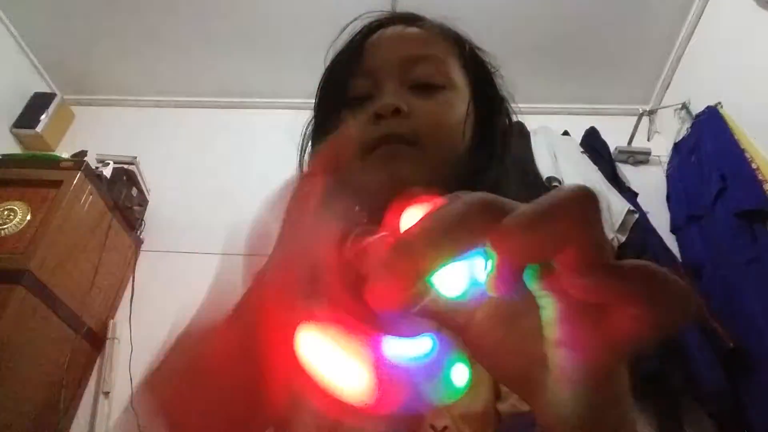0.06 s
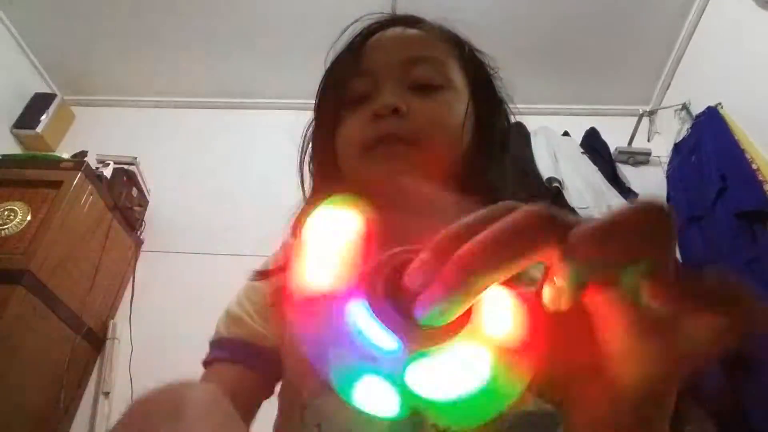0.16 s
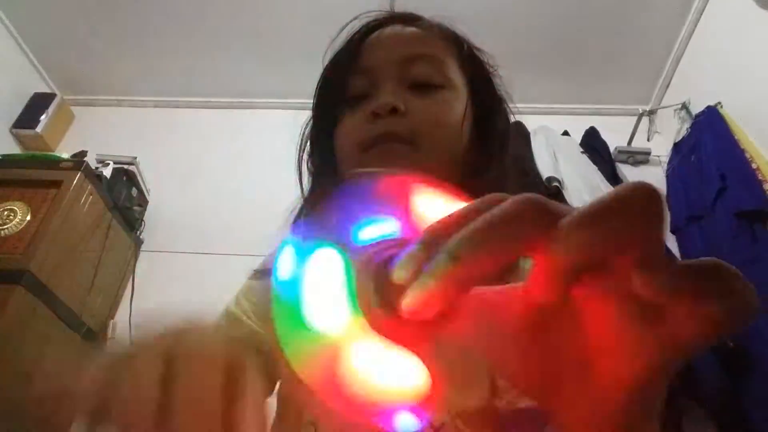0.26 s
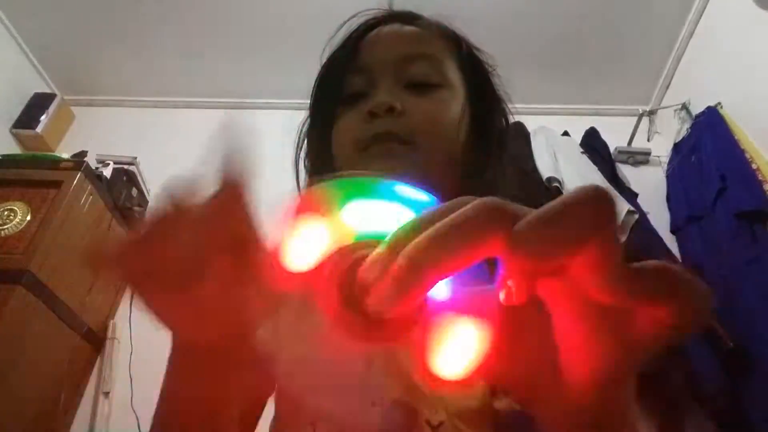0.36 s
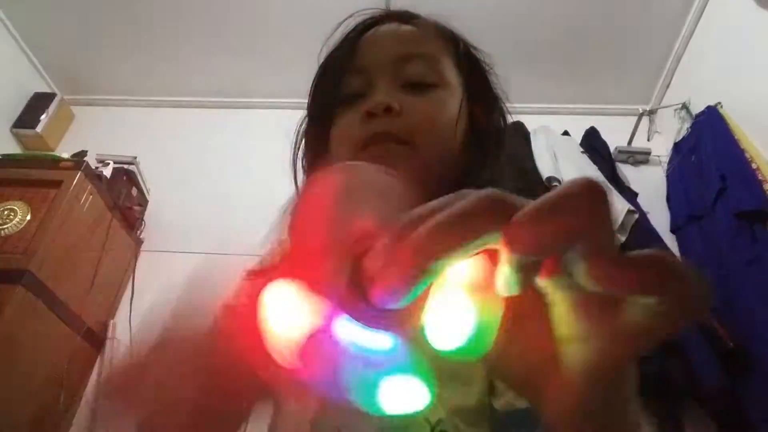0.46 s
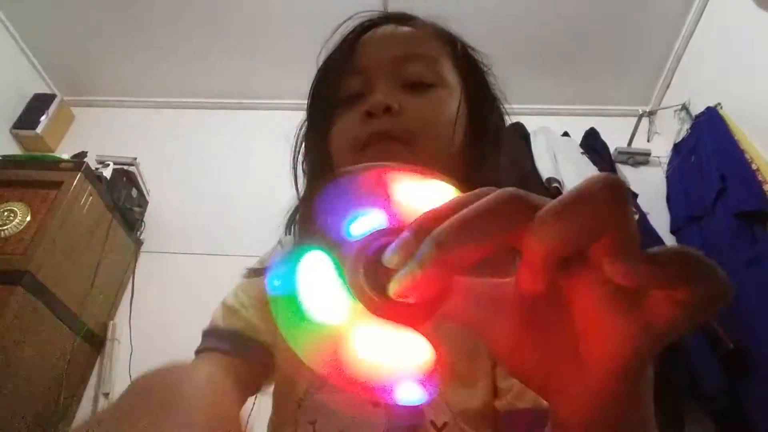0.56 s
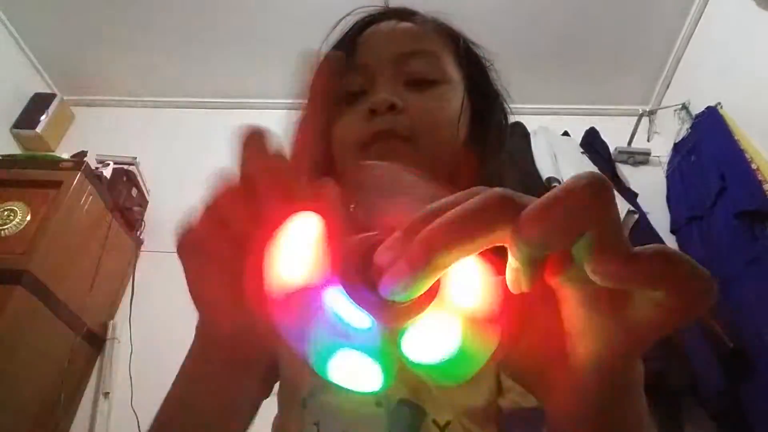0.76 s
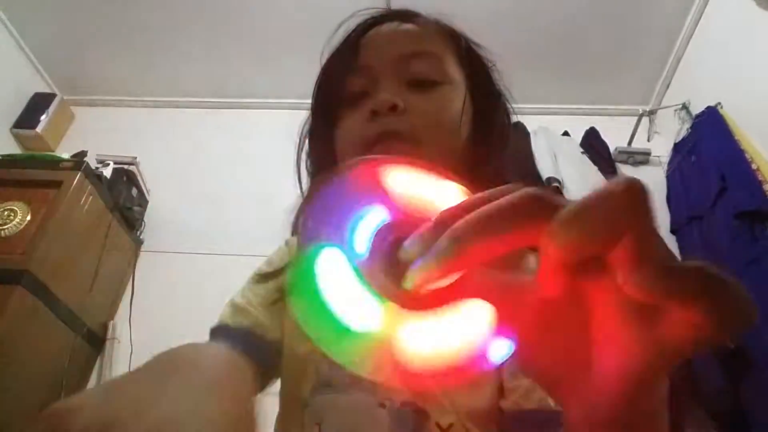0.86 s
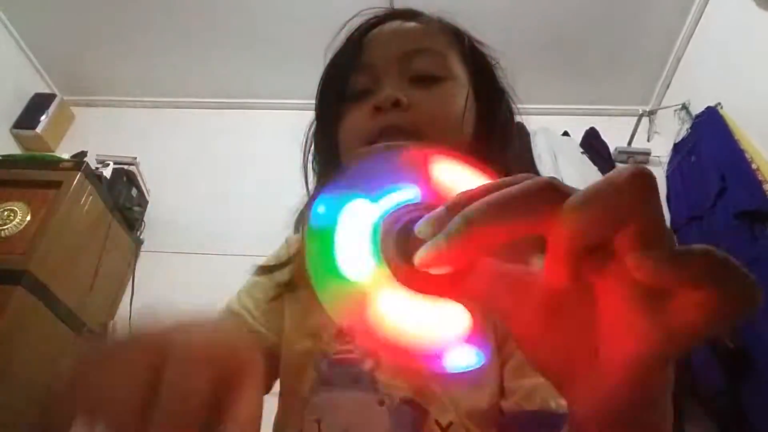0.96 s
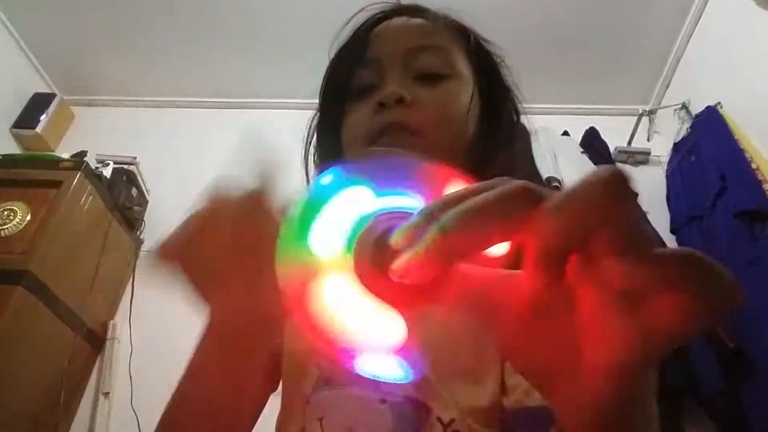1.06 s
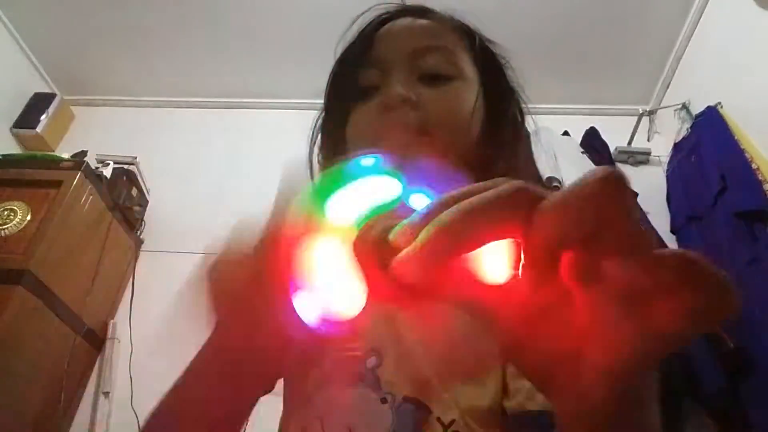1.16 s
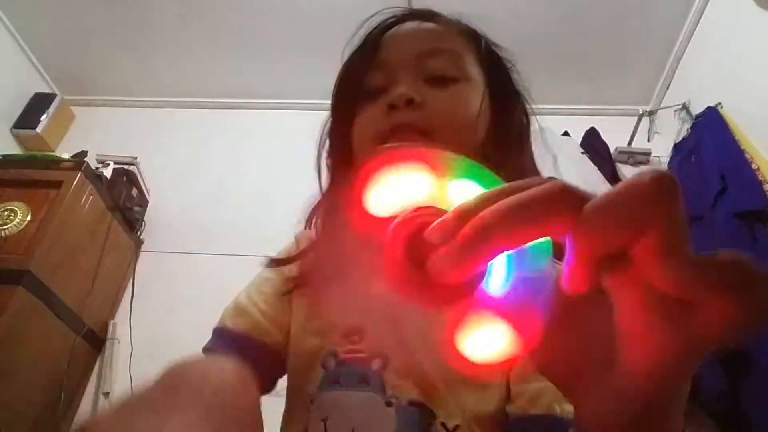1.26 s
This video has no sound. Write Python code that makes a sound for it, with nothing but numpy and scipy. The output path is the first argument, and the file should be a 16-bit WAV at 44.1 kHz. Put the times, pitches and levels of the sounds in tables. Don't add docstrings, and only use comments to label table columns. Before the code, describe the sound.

A plastic toy spinner rattles faintly and ticks close to the microphone in a quiet, softly humming room. A finger flicks it at about 0.2 seconds, with bright ringing clicks bouncing until 0.33, then again at 0.6. A small air puff bumps the microphone near 0.7. A third flick at 0.97 sets off quick chatter, thinning into tiny ticks by 1.3 seconds.

```python
import sys
import numpy as np
from scipy import signal
from scipy.fft import rfft, irfft
from scipy.io import wavfile
from scipy.ndimage import uniform_filter1d

SR = 44100
rng = np.random.default_rng(int(sys.argv[2]) if len(sys.argv) > 2 else 0)


def linear_from_db(decibels):
    return 10 ** (np.asarray(decibels, float) / 20)


def wav_record(signal):
    frames = np.transpose(np.atleast_2d(signal))
    bounded = np.clip(frames, -1, 1)
    quanta = np.round(bounded * 32767).astype(np.int16)
    wavfile.write(sys.argv[1], SR, quanta)


N = 57330


def ring(x, hz, width):
    return signal.lfilter(*signal.iirpeak(hz, hz / width, SR), x)


def steep(x, hz, width):
    return ring(ring(x, hz, 1.49 * width), hz, 1.49 * width)


def level(x, db):
    return x * linear_from_db(db) / np.sqrt(np.mean(x ** 2))


def walk(rate_hz):
    k = int(SR / rate_hz)
    smooth = uniform_filter1d(uniform_filter1d(rng.standard_normal(N), k), k)
    return level(smooth, 0)


def clicks(rows, rise_s):
    # f/Hz, width/Hz, level/dB
    body = [(1740, 770, -25), (2620, 520, -23), (3216, 600, -19), (4020, 1200, -23.5)]
    treble = [(6115, 600, -8), (6900, 390, -17), (7685, 260, -18.5), (8360, 150, -18.5), (9830, 390, -29.5),
              (11200, 360, -28.5), (12700, 800, -55), (15900, 700, -46)]
    modes = [*body, *treble]
    main_width_hz, detune, scatter_db = 350, 0.019, 1.5
    contact_s, tail_s, tail = 0.0023, 0.011, linear_from_db(-8)
    size, lead_s = 3072, 0.003
    t = np.arange(size) / SR - lead_s
    fade = np.exp(-(t / contact_s) ** 2) * (1 - tail) + tail * np.exp(-np.abs(t) / tail_s)
    push = np.where(t < 0, np.exp(-(t / rise_s) ** 2), fade)
    strike = linear_from_db(16) * (np.arange(size) == int((lead_s - rise_s / 2) * SR))
    out = np.zeros(N + 4096)
    for s, db, hz, body_db, treble_db in rows:
        scratch = linear_from_db(-8) * push * rng.standard_normal(size)
        x = strike + scratch
        chance = rng.standard_normal((len(modes), 2))
        y = level(ring(steep(x, hz, main_width_hz), hz, 3 * main_width_hz), 0)
        for (f, w, g), c in zip(modes, chance):
            f = f * (1 + detune * c[1])
            side_db = body_db if f < hz else treble_db
            y = y + level(steep(x, f, w), g + scatter_db * c[0] + side_db)
        i = int((s + rise_s) * SR)
        out[i:i + size] += y * linear_from_db(db) / np.abs(y).max()
    return out[int(lead_s * SR):][:N]


def room():
    # f/Hz, level/dB
    air_colour = [(30, -39), (48, -3), (303, -1.5), (380, -8), (620, -11.5), (2230, -27), (4080, -34),
                  (5310, -31), (16000, -47.5)]
    # f/Hz, level/dB
    hum_tones = [(251, -69.5), (300, -62.5), (500, -73.5)]
    hz, db = np.array(air_colour).T
    f = np.maximum(np.arange(N // 2 + 1) * SR / N, 1)
    colour = linear_from_db(np.interp(np.log(f), np.log(hz), db))
    air = irfft(rfft(rng.standard_normal(N)) * colour, N)
    hum = 0
    for f0, g in hum_tones:
        loudness = linear_from_db(g + 1.5 * walk(37))
        pitch_hz = f0 * (1 + 0.00822 * walk(16.3))
        hum = hum + loudness * np.sin(2 * np.pi * np.cumsum(pitch_hz) / SR)
    return level(air, -61) * linear_from_db(2 * walk(9.9)) + hum


def puff():
    # t/s, level/dB, f/Hz, direction and size (1 = full)
    air_bumps = [
        (.6990, -39.5, 86, 0.9),
        (.7205, -47, 83, -1.1),
        (.685, -50, 510, 1),
        (.6968, -43.5, 355, 0.91),
    ]
    rush_s, rush_len_s = 0.692, 0.009
    t = np.arange(N) / SR
    bumps = 0
    for s, db, hz, way in air_bumps:
        fade = np.exp(-((t - s) * hz * 2.3) ** 2)
        bumps = bumps + linear_from_db(db) * np.sin(2 * np.pi * hz * (t - s)) * fade * way
    rush = level(steep(rng.standard_normal(N), 3200, 3400), -53.5)
    return bumps + rush * np.exp(-((t - rush_s) / rush_len_s) ** 2)


def bearing():
    # t/s, level/dB
    rattle = [(.04, -63), (.11, -61), (.2, -65), (.25, -58), (.3, -49.5), (.35, -60.5), (.45, -63),
              (.56, -64), (.62, -63.5), (.68, -57.5), (.8, -64.5), (.9, -66.5), (.96, -63.5), (1.02, -54.5),
              (1.1, -61.5), (1.15, -64.5), (1.195, -59.5), (1.3, -60)]
    # f/Hz, width/Hz, level/dB
    race = [(2520, 450, -12.5), (3320, 400, -13), (4300, 880, -14), (4900, 600, -10.5), (5350, 253, 0),
            (6220, 430, -10), (7060, 560, -32), (8020, 830, -14), (9440, 480, -31), (10970, 550, -23.5),
            (12900, 1300, -32), (14700, 500, -26)]
    # rate/(1/s), level/dB, f/Hz, width/Hz
    cage = (255, -3.5, 5378, 330)
    balls_per_s, ball_spread_db, ball_cap, hiss_share = 3000, 1.5, 3.2, 0.48
    hit, size = rng.random(N), rng.exponential(size=N)
    sign, hiss = rng.standard_normal(N), rng.standard_normal(N)
    ball_size = linear_from_db(ball_spread_db * np.minimum(size, ball_cap))
    balls = (hit < balls_per_s / SR) * ball_size * np.sign(sign)
    push = level(balls, 0) + hiss_share * hiss
    y = 0
    for k, (f, w, g) in enumerate(race):
        y = y + (-1) ** k * linear_from_db(g) * steep(push, f, w)
    cage_rate, cage_db, cage_hz, cage_width_hz = cage
    taps = (hit > 1 - cage_rate / SR) * sign
    y = level(y, 0) + level(steep(taps, cage_hz, cage_width_hz), cage_db)
    flutter = linear_from_db(2.5 * walk(143))
    s, db = np.array(rattle).T
    return level(y * flutter, 0) * linear_from_db(np.interp(np.arange(N) / SR, s, db))


def loose_parts():
    # t/s, peak level/dB, main ring f/Hz, body level/dB, treble level/dB
    loose_ticks = [(0.0338, -47.5, 5500, 3, 6), (0.0717, -54, 5000, 2, -6), (0.0952, -41.5, 5350, -17, -3),
                   (0.3656, -50, 5560, 11, 8), (0.4079, -41, 5290, -12, -2), (0.4414, -46, 5360, 3, -3),
                   (0.4988, -56, 5530, 0, 3), (0.5121, -37.5, 5000, -9, -3), (0.5244, -45.5, 5470, -6, -4),
                   (0.5706, -55, 5250, 0, 3), (0.596, -51, 5390, 13, -4), (0.6534, -40, 5000, 0, 2),
                   (0.6684, -44, 5000, -4, 1), (0.7339, -40.5, 5400, 5, 6), (0.819, -48.5, 5300, -5, 7),
                   (0.9138, -52, 5410, -13, -16), (0.9368, -53, 5200, -5, 0)]
    chatter = [(0.9861, -35, 5340, 3, 2), (0.996, -38, 5240, -6, -2), (1.0012, -42, 5330, 8, 5),
               (1.0104, -46, 5500, 15, 9), (1.02, -44, 4560, 2, 13), (1.0262, -50, 5670, 0, 3),
               (1.0319, -42, 5550, 6, 6), (1.0354, -44, 5560, 5, 2), (1.0406, -46, 5180, 0, 2),
               (1.055, -46, 5400, 8, 6), (1.0729, -40, 5450, -7, -5), (1.0755, -42, 5230, -1, -3),
               (1.086, -41, 5040, 2, 0), (1.0977, -42, 5270, 7, 1), (1.173, -48, 5350, 2, -2),
               (1.1953, -49, 5090, -10, -2), (1.285, -45.5, 4930, -9, -3)]
    further_ticks = [(.2290, -44, 5200, -8, -9), (.3010, -43, 5140, 7, 7), (.3470, -49, 4970, 0, 7),
                     (.4230, -56, 5350, -3, 8), (.4560, -47, 5460, -1, -7), (.4660, -51, 5200, 0, -10),
                     (.4840, -68, 5250, 0, -5), (1.168, -52, 5300, -2, -2), (1.1785, -52, 4800, -4, -8),
                     (1.1835, -52, 5350, -10, -6), (1.189, -50, 5200, -6, -6), (1.1925, -46, 5100, -8, -10),
                     (1.2030, -52, 5200, -8, -8), (1.2060, -52, 5030, -8, -4), (1.2170, -59, 5300, 7, 5),
                     (1.2505, -55.5, 5450, 7, 0), (1.2570, -58, 5350, 0, 0), (1.2670, -51, 4900, 2, 1),
                     (1.2760, -54, 5630, -6, -6), (1.2910, -51, 5400, -6, -6), (1.2980, -52, 5300, -4, -4)]
    rise_s = 0.001099
    return clicks(loose_ticks, rise_s) + clicks(chatter, rise_s) + clicks(further_ticks, rise_s)


def glints():
    # t/s, peak level/dB
    edge_contacts = [
        (.2165, -66),
        (.2625, -62),
        (0.314, -58),
        (0.614, -55),
        (0.632, -55),
        (0.985, -44),
        (1.002, -64),
    ]
    # f/Hz, width/Hz, level/dB
    glint_modes = [(15400, 1250, -1), (11100, 480, -4)]
    glint_s = 0.0011
    t = np.arange(N) / SR
    gate = 0
    for s, db in edge_contacts:
        gate = gate + linear_from_db(db) * np.exp(-((t - s - glint_s / 2) / glint_s) ** 2)
    x = rng.standard_normal(N)
    scratch = sum(linear_from_db(g) * steep(x, f, w) for f, w, g in glint_modes)
    return gate * level(scratch, 0)


def knocks():
    # t/s, low knock level/dB, mid knock level/dB
    landings = [
        (0.217, -38, -39.5),
        (0.262, -40, -38),
        (.2760, -44.5, -53),
        (0.408, -69, -58),
        (0.6086, -42.5, -42.5),
        (.6180, -43.5, -53),
        (0.6278, -38.5, -55),
        (0.97, -46, -56),
        (0.984, -44.5, -54),
    ]
    # f/Hz, width/Hz, level/dB
    low_modes = [(345, 310, 4.5), (610, 460, 5), (1110, 640, 1.5), (1840, 480, 4)]
    mid_modes = [(2500, 620, 0), (3400, 680, 0.5)]
    tap = np.eye(1, 999)[0]
    out = 0
    for col, modes in enumerate([low_modes, mid_modes]):
        push = np.zeros(N)
        for row in landings:
            push[int(row[0] * SR)] = linear_from_db(row[1 + col])
        knock = sum(linear_from_db(g) * steep(tap, f, w) for f, w, g in modes)
        out = out + np.convolve(push, knock / np.abs(knock).max())[:N]
    return out


def pings():
    # t/s, peak level/dB, f/Hz, width/Hz
    single_rings = [(.2160, -39.5, 3430, 400), (.2165, -48.5, 880, 300), (.2165, -45.5, 590, 250),
                    (0.217, -49, 7400, 400), (.2610, -39, 3150, 380), (.2620, -20, 5024, 247),
                    (.2630, -27.5, 5530, 250), (.9690, -27, 5260, 296), (.2615, -28.5, 6270, 320),
                    (0.262, -28.5, 6770, 350), (.2610, -51, 1700, 300), (.2680, -52.5, 1030, 250),
                    (.2760, -37, 6090, 260), (.2760, -41, 4600, 400), (0.3174, -45, 3590, 400),
                    (.4085, -50.5, 2600, 258), (.4085, -50.5, 6400, 260), (.4230, -58, 2840, 400),
                    (0.512, -56, 3250, 300), (.5030, -54.5, 6280, 200), (.6090, -35.5, 3370, 390),
                    (0.6091, -38, 6070, 260), (.6090, -45.5, 1740, 310), (.6090, -50.5, 860, 400),
                    (.6145, -43.5, 3400, 400), (.6280, -39, 6070, 310), (0.631, -44, 3650, 250),
                    (.9685, -45.5, 4580, 230), (0.9698, -47.5, 3320, 310), (.9850, -53, 2470, 300),
                    (1.0110, -52, 4630, 250), (1.0340, -53, 3800, 350), (1.0348, -62, 3300, 300),
                    (1.0860, -62, 3230, 350), (1.2530, -62, 3300, 400), (.6280, -22.5, 5004, 474)]
    tap = np.eye(1, 999)[0]
    out = np.zeros(N + 999)
    for s, db, hz, width in single_rings:
        y = steep(tap, hz, width)
        i = int(s * SR)
        out[i:i + 999] += y * linear_from_db(db) / np.abs(y).max()
    return out[:N]


def flicks():
    # t/s, peak level/dB, main ring f/Hz, body level/dB, treble level/dB
    finger_hits = [(0.2144, -45, 5240, 0, -7), (0.2159, -27.5, 5310, -13, 6), (0.2193, -29, 5350, 3, -0.5),
                   (0.2252, -45, 5200, -8, 11), (0.2565, -40, 5600, 6, 8), (0.2607, -25, 5270, -0.5, 5),
                   (0.2668, -35.5, 5000, 8, -3), (0.2715, -36, 5300, 3, -5), (0.2748, -26, 5060, 11, 6),
                   (0.2885, -41.5, 5700, 12, 1), (0.3126, -39, 5770, 0, -5), (0.3175, -30.5, 5220, 5, 1),
                   (0.3265, -36.5, 5320, 1, 3), (0.3341, -37, 5200, 10, 3.5), (0.609, -33, 5480, 6, 2),
                   (0.6108, -28, 5320, 5, -0.5), (0.6126, -29, 5350, -2, -9), (0.6143, -32, 5350, 3, 5),
                   (0.6276, -29.5, 5130, 7, 7), (0.6375, -37, 5100, -3, 4), (0.6415, -35, 5320, 1, 1.5),
                   (0.968, -34.5, 5100, 1, 4), (0.9795, -39.5, 5350, 7, 2), (0.9845, -29, 5330, -6, 1)]
    return clicks(finger_hits, rise_s=0.0006)


def scene():
    background = room() + puff()
    spinner = bearing() + loose_parts() + glints() + knocks() + pings() + flicks()
    return (background + spinner)[None]


def low_pass(x):
    return signal.sosfilt(signal.butter(12, 16430, fs=SR, output="sos"), x)


def record(dry):
    low_cut = signal.butter(3, 58, "high", fs=SR, output="sos")
    top_cut = signal.ellip(8, 0.2, 30, 15900, fs=SR, output="sos")
    x = signal.sosfilt(top_cut, signal.sosfilt(low_cut, dry))
    mix = x - 0.0005
    return low_pass(mix)


dry = scene()
out = record(dry)
wav_record(out)
```